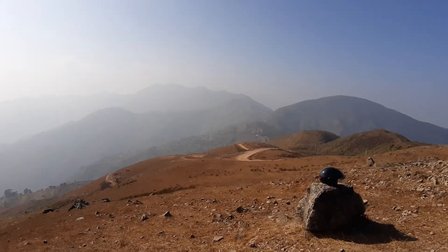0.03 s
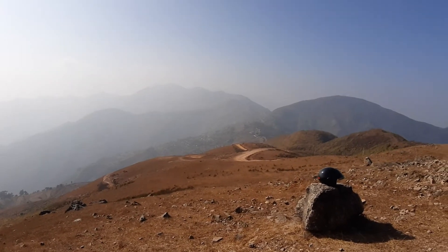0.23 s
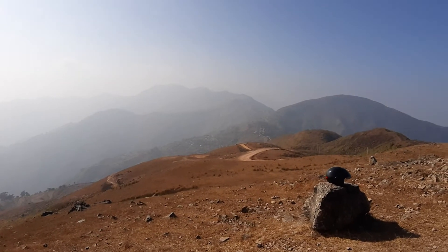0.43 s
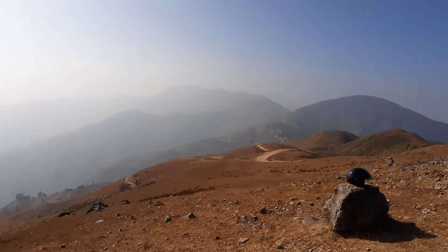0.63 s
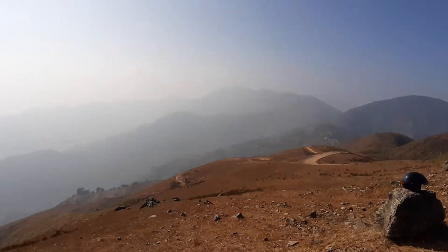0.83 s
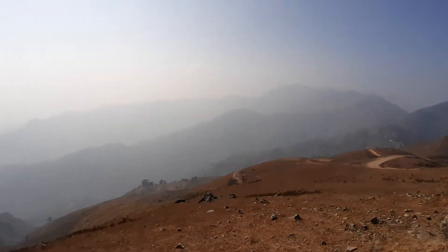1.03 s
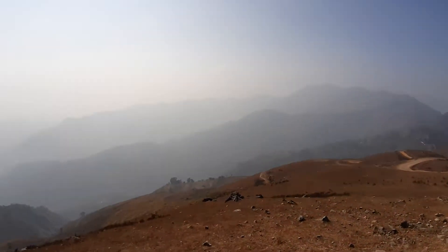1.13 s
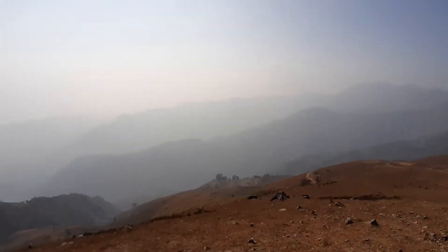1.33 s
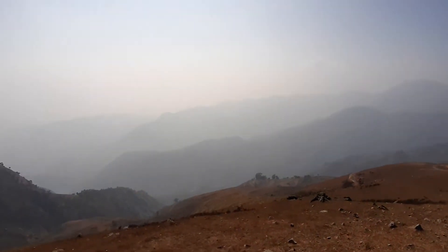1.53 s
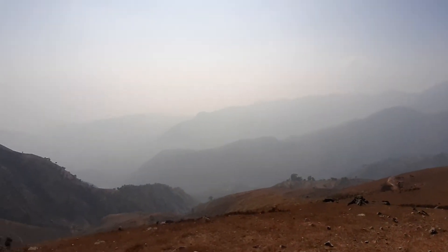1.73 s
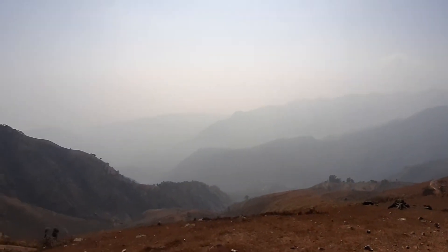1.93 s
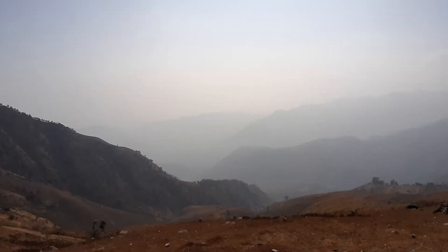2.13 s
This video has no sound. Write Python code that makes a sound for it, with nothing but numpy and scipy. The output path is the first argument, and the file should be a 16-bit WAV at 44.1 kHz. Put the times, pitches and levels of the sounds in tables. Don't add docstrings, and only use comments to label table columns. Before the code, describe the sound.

Strong wind buffets a stereo microphone on a bare hilltop, then drops to weaker gusts

```python
import sys
import numpy as np
from scipy import signal
from scipy.fft import rfft, irfft
from scipy.io import wavfile
from scipy.ndimage import uniform_filter1d

SR = 44100
rng = np.random.default_rng(int(sys.argv[2]) if len(sys.argv) > 2 else 0)


def put_to_file(sound):
    columns = np.atleast_2d(sound).T
    safe = np.clip(columns, -1, 1)
    whole_steps = np.round(safe * 32767)
    wavfile.write(sys.argv[1], SR, whole_steps.astype(np.int16))


def elevation(decibels):
    levels = np.asarray(decibels, float)
    return 10 ** (levels / 20)


N = 95785

# [f/Hz, density/dB per Hz]
AIR_TONE = [(1200, -8), (2000, -4), (3000, 0), (4500, -3), (6500, -4), (8000, -10), (10000, -20)]
# [t/s, level/dB]
AIR_LEVEL = [
    (0, -72.5),
    (.72, -77),
    (.8, -75),
    (1.4, -71.5),
    (2.17, -71.5),
]
# [f/Hz, density/dB per Hz]
GRASS_TONE = [(7000, -15), (9000, -4), (11000, 0), (13500, -4), (16000, -4)]
# [t/s, level/dB]
GRASS_LEVEL = [(0.03, -85), (0.52, -88), (0.55, -84), (0.71, -93), (0.8, -82), (0.89, -89), (1.14, -88),
               (1.23, -78), (1.35, -87), (1.55, -79), (1.76, -85), (1.93, -80), (2.14, -84)]
# [t/s, gain/dB]
BASS_SWELL = [(0, 0), (.5, -1), (.75, -3), (.9, -8.5), (1.05, -3), (1.25, 0.5), (1.45, 4), (1.8, 0.5),
              (2.07, 5)]
# [f/Hz, density/dB per Hz]
EDDY_TONE = [(40, -9.5), (170, -6), (390, -0.5), (750, -9), (1200, -25), (2400, -50), (5000, -93),
             (16000, -145)]
# [f/Hz, gain/dB]
PORT_TONE = [
    [(40, -9.5), (80, -3.5), (220, -1), (390, 2), (560, -4), (1200, -5), (2500, -5), (6000, -2.5)],
    [(30, 3.5), (80, 14), (150, 12.5), (390, 1), (700, 3), (3000, 4)],
]
# [t/s, level/dB]
LEFT_LEVEL = [(0, -14.8), (0.07, -15.9), (0.16, -15.1), (0.3, -10.7), (0.52, -10.0), (0.64, -14.3),
              (0.76, -17.7), (0.83, -28.9), (0.95, -36.7), (1.07, -33.6), (1.13, -22.3), (1.22, -19.8),
              (1.33, -28.3), (1.47, -30.2), (1.56, -25.5), (1.75, -26.5), (1.9, -28.7), (2.17, -29.1)]
# [t/s, level/dB]
RIGHT_LEVEL = [(0, -20.2), (0.07, -20.5), (0.17, -15.4), (0.3, -20.7), (0.45, -22.5), (0.56, -22.0),
               (0.66, -21.2), (0.8, -26.9), (0.95, -24.7), (1.0, -28.3), (1.1, -26.5), (1.25, -25.9),
               (1.37, -29.1), (1.53, -36.2), (1.75, -34.3), (1.9, -33.9), (2.07, -23.8), (2.17, -29.0)]
# [t/s, air speed/oct, unsteadiness/oct]
LEFT_FLOW = [(0, 0.61, 0.39), (0.069, 0.44, 0.37), (0.16, 0.52, 0.41), (0.301, 0.49, 0.33),
             (0.521, 0.45, 0.39), (0.64, 0.5, 0.4), (0.745, 0.48, 0.33), (0.829, -0.16, 0.079),
             (0.95, -0.24, 0.066), (1.07, -0.18, 0.46), (1.13, 0.43, 0.43), (1.219, 0.69, 0.3),
             (1.329, 0.04, 0.059), (1.468, 0.37, 0.24), (1.561, 0.63, 0.17), (1.75, 0.27, 0.12),
             (1.899, 0.3, 0.074), (2.17, -0.09, 0.08)]
# [t/s, air speed/oct, unsteadiness/oct]
RIGHT_FLOW = [(0, -0.39, 0.45), (0.07, 0.11, 0.11), (0.17, -0.082, 0.54), (0.3, 0.24, 0.39),
              (0.45, -0.049, 0.31), (0.56, 0.0045, 0.083), (0.66, -0.15, 0.41), (0.8, -0.36, 0.28),
              (0.95, -0.34, 0.41), (1.0, -0.19, 0.22), (1.1, 0.26, 0.4), (1.25, -0.064, 0.14),
              (1.37, -0.33, 0.077), (1.53, -0.95, 0.24), (1.75, -1.52, 0.16), (1.9, -1.04, 0.23),
              (2.07, -0.95, 0.045), (2.17, -1.33, 0.32)]
# [t/s, strength/dB]
LEFT_SNAPS = [(0.126, 7.5), (0.1423, -2), (0.1784, 6.5), (0.2802, 10.5), (0.312, 3.5), (0.3416, 5.5),
              (0.3492, 4), (0.3578, 4.5), (0.367, 5), (0.4245, 2), (0.4465, 3), (0.4677, 4.5),
              (0.5158, 2.5), (0.708, 7.5), (0.7504, 10), (0.7716, 9.5), (0.805, 10.5), (0.8805, 15),
              (0.925, 11), (0.989, 6.5), (1.0032, 14.5), (1.052, 9), (1.0953, 12), (1.2193, 9.5),
              (1.252, 13.5), (1.3002, 8.5), (1.3064, 12.5), (1.3332, 8.4), (1.3437, 12), (1.3702, 13.5),
              (1.399, 13.5), (1.4052, 16.5), (1.418, 16), (1.445, 15.5), (1.4533, 10.5), (1.5111, 15.7),
              (1.5317, 1), (1.5532, 14.5), (1.556, 16.5), (1.5674, 4), (1.5742, 14), (1.6012, 14),
              (1.6113, 8), (1.62, 10), (1.6419, 11.5), (1.6671, 11.3), (1.7034, 22), (1.726, 16.5),
              (1.7365, 14), (1.7695, 23), (1.7885, 22), (1.8313, 7), (1.8558, 12), (1.8945, 9.5),
              (1.8998, 6), (1.953, 9.5), (2.006, 1), (2.0564, 6)]
# [t/s, strength/dB]
RIGHT_SNAPS = [(0.0136, 11), (0.0598, 5.5), (0.0834, 9), (0.099, 8), (0.123, 14.5), (0.1324, 12),
               (0.1554, 10.5), (0.1663, 8.5), (0.1837, 5), (0.2157, 11.5), (0.2314, 4), (0.2474, 18.5),
               (0.288, 7.5), (0.3283, 20), (0.3405, 2.5), (0.3666, 13), (0.373, 11.5), (0.3876, 14),
               (0.4195, 4.5), (0.4304, 3.5), (0.491, 10.5), (0.5028, 3), (0.5446, 7), (0.5889, 17.5),
               (0.6099, 10.5), (0.629, 26.5), (0.6776, 7.5), (0.6988, 7.5), (0.749, 25), (0.7528, 26),
               (0.7764, 5.5), (0.8012, 6), (0.83, 12), (0.8429, 6.5), (0.8833, 11), (0.9121, 17.5),
               (0.9247, 8), (0.9408, 25.5), (0.969, 12), (1.004, 10), (1.0133, 20.5), (1.03, 10),
               (1.041, 19), (1.0573, 11), (1.082, 11.5), (1.1148, 5.5), (1.1225, 6), (1.1322, 6.5),
               (1.138, 4), (1.1735, 29.5), (1.182, 8), (1.1883, 4), (1.2, 3.5), (1.2477, 10), (1.2673, 10),
               (1.2828, 13), (1.3243, 6.1), (1.4107, 14), (1.987, 3)]

BANDS_HZ = 22 * 2 ** np.arange(0, 9.7, 1 / 3)
HZ = np.fft.rfftfreq(N, 1 / SR) + 1e-3

GRASS_TRIM_DB = 5
PORT_CUT_HZ, SWELL_BELOW_HZ = 90, 125

SMALL_SNAPS_PER_S = (300, 150)
SMALL_SNAP_DB_PER_OCT = (4, 9)
SNAP_HALF_S = (0.0012, 0.0021)
SNAP_PUSH_PER_DB = (0.3262, 0.17)
SNAP_OCT_PER_DB, FASTEST_OCT = 0.0437, 1.2

FLUTTER_HZ, LULL_HZ = 266, 29.8
FLUTTER_SHARE, LULL_SHARE = (0.21, 0.5), (0.035, 0.17)

SPEED_DB_PER_OCT = (1.5, 5.0)
LUMP_DB, LUMP_HZ = 1.17, 14
FINE_FROM_HZ, FINE_DB_PER_OCT = 1860, (21, 20.5)

CREST_FROM_HZ = 1300
CREST_DB, TROUGH_DB = (17, 6), (9, 5.5)
SQUARE_LAW_PER_OCT = (0.38, 0.02)


def rms_one(x):
    return x / np.sqrt(np.mean(x ** 2) + 1e-20)


def in_time(rows):
    s, *columns = np.transpose(rows)
    return [np.interp(np.arange(N) / SR, s, column) for column in columns]


def at_hz(points, hz):
    table_hz, db = np.transpose(points)
    return np.interp(np.log(hz), np.log(table_hz), db)


def smooth_twice(x, first, second):
    return uniform_filter1d(uniform_filter1d(x, size=first), size=second)


def bass_cut(x, hz):
    lead = np.concatenate([x[..., 2000:0:-1], x], axis=-1)
    sos = signal.butter(2, hz, "high", fs=SR, output="sos")
    return signal.sosfilt(sos, lead)[..., 2000:]


def drift(rate_hz):
    r = np.exp(-2 * np.pi * rate_hz / SR)
    x = rng.standard_normal(N + SR // 4)
    sos = [[1, 0.0098, 0.0089, 1, -2 * r, r * r], [1, 0.0098, 0.0089, 1, -r, 0.094]]
    return rms_one(signal.sosfilt(sos, x)[-N:])


def third_octaves(white):
    away = 3 * np.abs(np.log2(HZ / BANDS_HZ[:, None]))
    weight = np.cos(np.pi / 2 * np.minimum(away, 1)) ** 2
    return irfft(rfft(white) * weight, N)


def hiss(tone):
    inside = (HZ > tone[0][0]) & (HZ < tone[-1][0])
    spectrum = rfft(rng.standard_normal((2, N)))
    return rms_one(irfft(spectrum * elevation(at_hz(tone, HZ)) * inside, N))


def far_air():
    return elevation(in_time(AIR_LEVEL)[0]) * hiss(AIR_TONE)


def dry_grass():
    return elevation(in_time(GRASS_LEVEL)[0] + GRASS_TRIM_DB) * hiss(GRASS_TONE)


def snap_kicks(snaps, unsteady, side):
    hit = rng.random(N) < SMALL_SNAPS_PER_S[side] / SR
    small = np.minimum(rng.exponential(1, N), 2) * hit
    kicks_db = SMALL_SNAP_DB_PER_OCT[side] * np.abs(unsteady) * small
    s, strength_db = np.transpose(snaps)
    kicks_db[(s * SR).astype(int)] = strength_db
    return kicks_db


def speed_waver(kicks_db, unsteady, side):
    waver = FLUTTER_SHARE[side] * drift(FLUTTER_HZ) + LULL_SHARE[side] * drift(LULL_HZ)
    bump = np.exp(-0.5 * (np.arange(-300, 301) / SR / SNAP_HALF_S[side]) ** 2)
    waver = unsteady * waver + SNAP_OCT_PER_DB * np.convolve(kicks_db, bump, "same")
    return FASTEST_OCT * np.tanh(waver / FASTEST_OCT)


def eddies(speed, waver, unsteady, kicks_db, side):
    swell_db = in_time(BASS_SWELL)[0]
    white = rng.standard_normal(N) + SNAP_PUSH_PER_DB[side] * kicks_db
    lumps = [drift(LUMP_HZ) for _ in range(5)]
    large, fine = 0, 0
    for k, (hz, band) in enumerate(zip(BANDS_HZ, third_octaves(white))):
        db = at_hz(EDDY_TONE, hz / 2 ** (speed + waver))
        db = db + SPEED_DB_PER_OCT[side] * waver + LUMP_DB * lumps[k // 2 % 5]
        db = db + FINE_DB_PER_OCT[side] * unsteady * max(np.log2(hz / FINE_FROM_HZ), 0)
        db = db + swell_db * (hz < SWELL_BELOW_HZ)
        band = band * elevation(at_hz(PORT_TONE[side], hz) + smooth_twice(db, 30, 20))
        if hz < CREST_FROM_HZ:
            large = large + band
        else:
            fine = fine + band
    return bass_cut(large, PORT_CUT_HZ), fine


def wind_port(level, flow, snaps, side):
    speed, unsteady = in_time(flow)
    kicks_db = snap_kicks(snaps, unsteady, side)
    waver = speed_waver(kicks_db, unsteady, side)
    large, fine = eddies(speed, waver, unsteady, kicks_db, side)
    spread = np.sqrt(smooth_twice(large ** 2, 3000, 3000))
    swing = np.clip(large / spread, -2.4, 2.4)
    shed_db = CREST_DB[side] * np.maximum(swing, 0) + TROUGH_DB[side] * np.maximum(-swing, 0)
    shed_db = shed_db - 0.72 * CREST_DB[side]
    fine = fine * elevation(uniform_filter1d(unsteady * shed_db, size=12))
    pressure = (large + fine) / spread
    pressure = pressure + SQUARE_LAW_PER_OCT[side] * unsteady * (pressure ** 2 - 1)
    return elevation(in_time(level)[0]) * pressure


def scene():
    left = wind_port(LEFT_LEVEL, LEFT_FLOW, LEFT_SNAPS, side=0)
    right = wind_port(RIGHT_LEVEL, RIGHT_FLOW, RIGHT_SNAPS, side=1)
    return far_air() + dry_grass() + np.array([left, right])


def low_pass(x):
    return signal.sosfilt(signal.butter(12, 15800, fs=SR, output="sos"), x)


def record(dry):
    mix = bass_cut(dry, 24)
    mix = mix / (1 + mix ** 8) ** (1 / 8)
    return low_pass(mix)


dry = scene()
out = record(dry)
put_to_file(out)
```